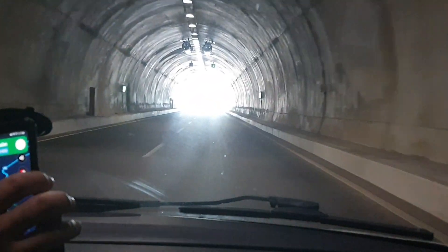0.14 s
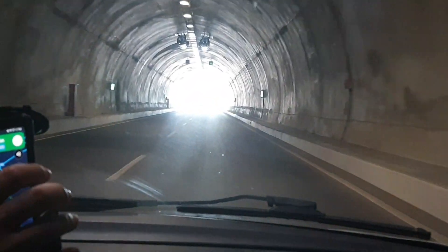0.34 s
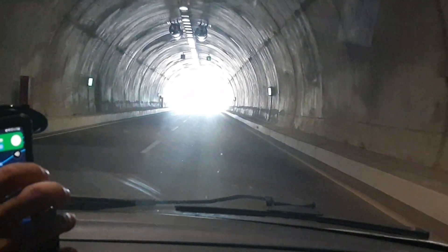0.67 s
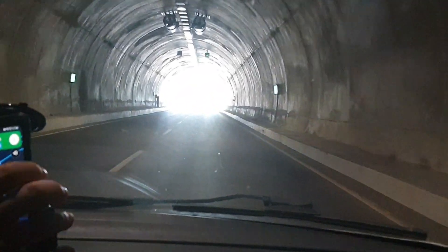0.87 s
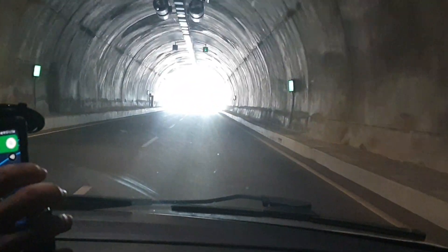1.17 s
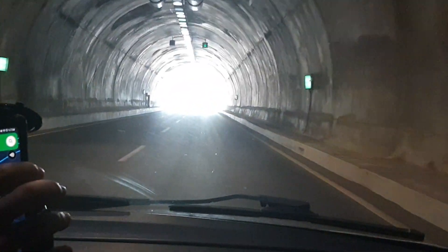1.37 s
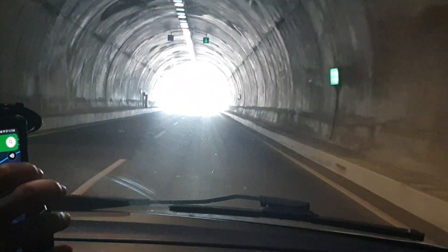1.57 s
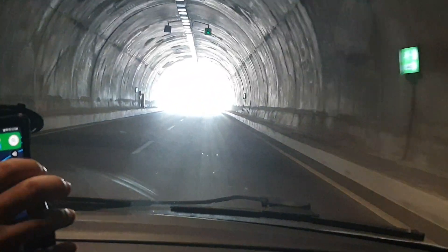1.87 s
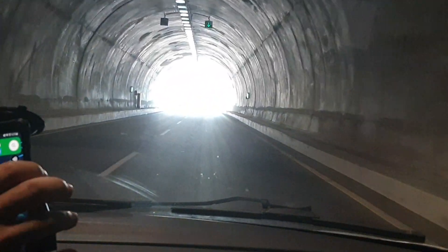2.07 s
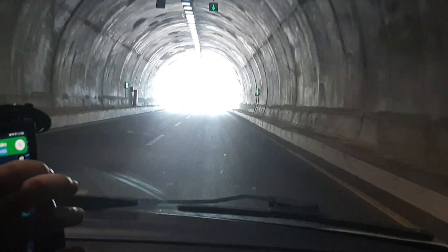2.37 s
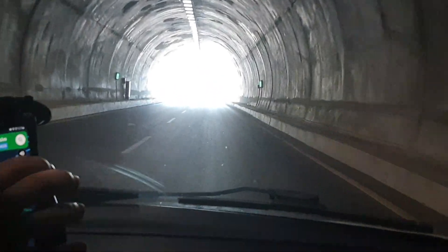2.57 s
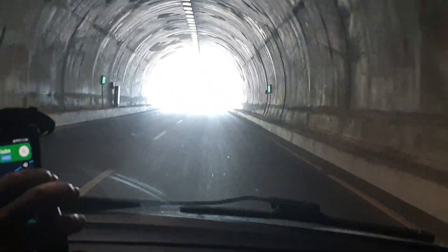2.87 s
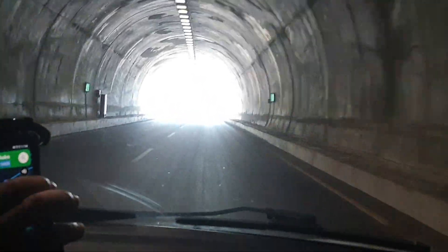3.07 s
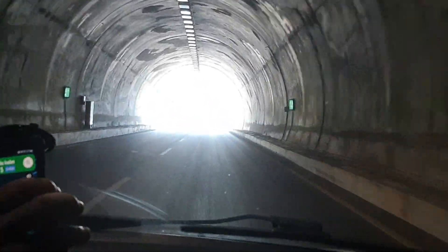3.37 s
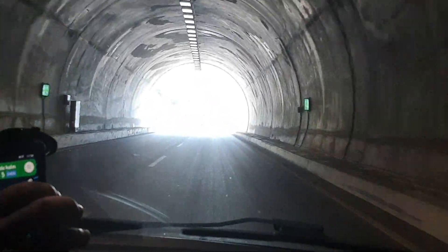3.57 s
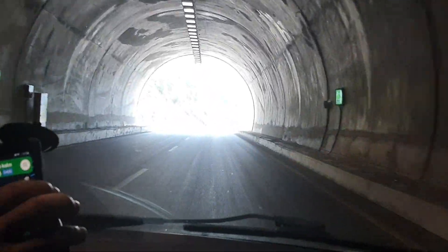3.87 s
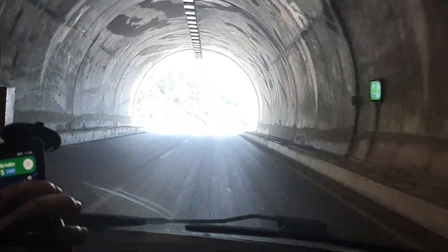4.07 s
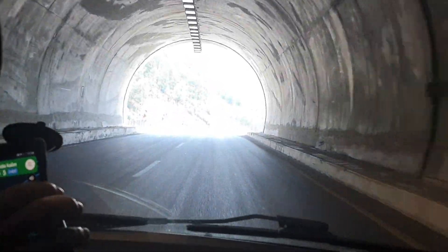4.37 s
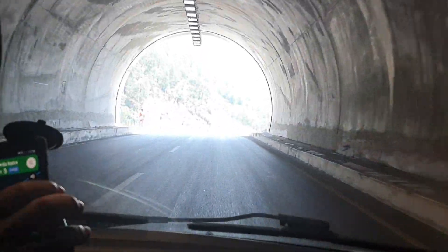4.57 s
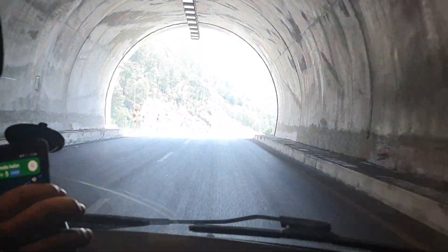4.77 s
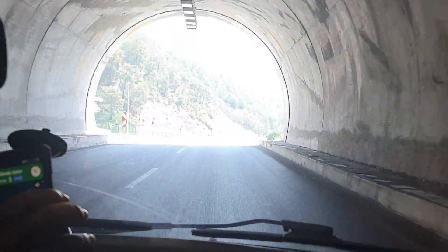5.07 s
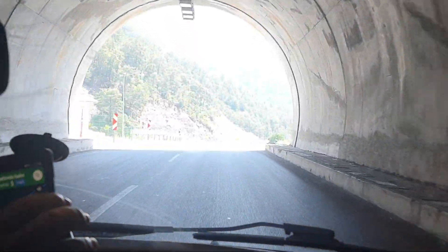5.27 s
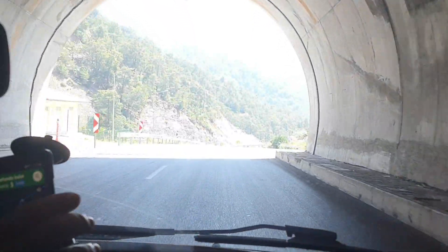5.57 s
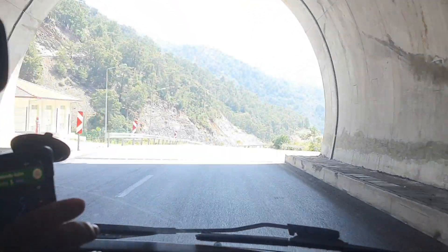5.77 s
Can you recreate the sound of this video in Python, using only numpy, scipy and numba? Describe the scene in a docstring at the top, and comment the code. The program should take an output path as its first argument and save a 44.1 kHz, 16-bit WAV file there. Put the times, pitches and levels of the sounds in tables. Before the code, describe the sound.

A car cabin in a road tunnel, heard from a handheld recorder close by. A loud, deep engine hum and thick road rumble dominate, with duller tyre roar and soft window hiss. A tiny rubbery squeak comes near one second, then a sharp finger snap on the right after two. The hum slowly drops in pitch and thins out near the end, with faint trim ticks.

```python
"""Car in a road tunnel

A car cruises through a road tunnel, heard from a handheld recorder in the cabin. The engine's firing
tone, a sine with an octave, booms and sags as the throttle eases. Road rumble, tyre roar, window hiss and
a faint whistle are shaped noise; trim ticks are noise puffs and seal squeaks are blurred sines.
A finger snaps on the right port, as clicks through resonators. The recorder's limiter rides on the boom."""
import sys
import numpy as np
from scipy import signal
from scipy.fft import rfft, irfft, next_fast_len
from scipy.io import wavfile
from scipy.ndimage import minimum_filter1d
from numba import njit

SR = 44100
rng = np.random.default_rng(int(sys.argv[2]) if len(sys.argv) > 2 else 0)


def to_wav(sig):
    """Store sig (one row per channel, or 1-D mono) as 16-bit WAV at the path in sys.argv[1].

    Samples outside -1..1 are clipped; the rate is SR.
    """
    pcm = np.clip(np.atleast_2d(sig), -1, 1) * 32767
    pcm = np.round(pcm).astype(np.int16)
    wavfile.write(sys.argv[1], SR, pcm.T)  # frames by channels


N = 261513   # samples


def engine(waver_db, waver_rad):
    """Periodic firing: a sine whose phase integrates the firing rate, with a rougher second harmonic."""
    # firing tone: (time [s], firing rate [Hz], boom level [dB], second harmonic level [dB])
    firing = [(0, 80.1, -8, -35), (2.05, 80.1, -7, -33), (2.35, 78.9, -7, -33), (2.9, 78.6, -7, -33),
              (3.5, 77.6, -10, -28), (3.93, 77, -12.5, -24), (4.03, 76.6, -19, -16), (4.19, 75.6, -16, -17),
              (4.3, 74.9, -12, -29), (4.55, 74.7, -9, -29), (4.9, 74.0, -10.5, -23),
              (5.3, 72.2, -12.5, -29), (5.6, 71.8, -18, -28), (5.8, 71.3, -22, -22), (5.93, 71, -25, -27)]
    hz, boom_db, octave_db = in_time(firing)
    phase = 2 * np.pi * np.cumsum(hz) / SR + waver_rad * drift(2.5)
    boom = from_db(boom_db + waver_db * drift(6.7)) * np.sin(phase)
    octave_phase = 2 * phase + .5 * drift(12.0)
    octave = from_db(octave_db + 1.5 * drift(12.0)) * np.sin(octave_phase)
    # the boom is equal at both ports, the octave leans right; the root makes the levels rms
    return np.sqrt(2) * (boom + octave * sides(-4.5))


def snaps():
    """Impulse excitation: each finger contact is a click and a rustle that ring the port's resonances."""
    # finger contacts: (time [s], click level [dB], rustle decay t60 [s])
    contacts = [(2.3278, -36, .03), (2.339, -38, .015), (2.343, -40, .05), (2.350, -21, .008),
                (2.352, -29, .02), (2.3566, -1, .003), (2.3577, 13, .003), (2.359, -22, .08),
                (2.363, -18, .006), (2.3672, -19, .006)]
    # resonances of the port: (frequency [Hz], level [dB], decay t60 [s])
    port = [(700, -10, 0.0024), (1500, 1, 0.0011), (3340, -13, 0.0013), (5600, -1, 0.00074),
            (7800, 0, 0.0012), (12000, 4.5, 0.00092), (14800, -1, .0015)]
    rustle_db, rustle_follows = -20, .7   # rustle behind a 0 dB click [dB]; dB per dB of click
    rustle_gain = sum(dying(s, rustle_db + rustle_follows * click_db, t60) for s, click_db, t60 in contacts)
    drive = rng.standard_normal(N) * rustle_gain + 1e-18
    for s, click_db, _ in contacts:
        drive[round(s * SR)] += from_db(click_db)
    ringing = 0
    for hz, level_db, t60 in port:
        # two-pole resonator: r sets the decay per sample, w the pitch
        r = from_db(-60 / (t60 * SR))
        w = 2 * np.pi * hz / SR
        mode = signal.lfilter([0, np.sin(w)], [1, -2 * r * np.cos(w), r * r], drive)
        ringing = ringing + from_db(level_db) * mode
    return ringing * from_db([[-24], [0]])   # the far port hears little


def squeak(blur_rad, octave_db):
    """Rubbing seal: two tones with attack, hold and decay, phase blurred by chance, with a weaker octave."""
    # squeaks of the rubber seal: (start [s], frequency [Hz], level [dB], hold from start [s], decay t60 [s])
    notes = [(1.13, 7200, -58, .04, .15), (1.155, 6540, -60.5, .12, .8)]
    attack_s, lean_db = .012, -16.0   # close to the right port
    t, out = np.arange(N) / SR, 0
    for s, hz, level_db, hold_s, t60 in notes:
        attack = np.clip((t - s) / attack_s, 0, 1)
        decay = from_db(level_db - 60 * np.clip(t - s - hold_s, 0, 1) / t60)
        phase = 2 * np.pi * hz * t + blur_rad * drift(120)
        tone = np.sin(phase) + from_db(octave_db) * np.sin(2 * phase)
        out = out + attack * decay * from_db(3.0 * drift(60)) * tone
    return out * sides(lean_db)


def ticks(rise_s):
    """Damped transients of loose trim: decaying puffs of coloured noise, the start softened by a low-pass."""
    # trim ticks: (time [s], level before softening [dB])
    puffs = [(4.357, -40), (4.68, -40), (5.125, -40), (5.557, -45), (5.77, -46)]
    # colour of a tick: (frequency [Hz], relative density [dB per Hz])
    trim = [(800, -14.5), (1950, 10), (2500, -3.5), (3250, 3.5), (3700, -11.5), (4300, 4), (5000, -10.5),
            (5700, -4), (7600, -11), (11000, -22)]
    t60_s, lean_db = .05, -8
    noise = rms_one(irfft(coloured(trim, channels=1)[1])[0, :N])
    shape = sum(dying(s, db, t60_s) for s, db in puffs) * sides(lean_db)
    r = np.exp(-1 / (rise_s * SR))
    return noise * signal.lfilter([1 - r], [1, -r], shape + 1e-18)


def rumble(swell_db):
    """Broadband road excitation in the bass: noise that follows part of the road's swell."""
    # colour of the rumble: (frequency [Hz], relative density [dB per Hz])
    rumble_colour = [(25, -24.5), (36, -6), (44, 1), (56, 3.5), (68, -2.5), (100, -0.5), (140, -4.5),
                     (175, -10.5), (200, -13), (235, -16.5), (330, -19), (450, -25), (700, -68),
                     (3000, -110)]
    level_db, follows = -14, 0.58   # follows: share of the swell
    return from_db(level_db + follows * swell_db) * road_noise(rumble_colour, gust_db=1.52, flutter_db=0.45)


def roar(swell_db):
    """Broadband tyre excitation in the middle range: noise that follows the whole swell."""
    # colour of the tyre roar: (frequency [Hz], relative density [dB per Hz])
    roar_colour = [(200, -25.5), (350, -18.5), (450, -8.5), (570, -10), (780, -12.5), (1300, -21.5),
                   (2400, -33.5), (4400, -38), (6300, -46), (8300, -45), (9000, -50.5), (9600, -63.5),
                   (12000, -64), (16000, -72)]
    return from_db(-34 + swell_db) * road_noise(roar_colour, gust_db=-0.63, flutter_db=1.0)


def hiss(swell_db):
    """Turbulence at the right window: broadband noise whose level exaggerates the swell."""
    # colour of the window hiss: (frequency [Hz], relative density [dB per Hz])
    window = [(700, -31), (1300, 14), (2200, -3.5), (3300, -17.5), (4300, -9), (6000, -20.5), (8000, -26),
              (10000, -37.5), (13000, -60.5)]
    level_db, follows = -47, 1.7   # follows: dB per dB of swell
    return from_db(level_db + follows * swell_db) * from_right(window, lean_db=-3.5, flutter_db=3.0)


def whistle():
    """Narrow-band noise: a faint breathy whistle close to the right port, rising to join the hiss."""
    # band of the whistle: (frequency [Hz], relative density [dB per Hz])
    band = [(3600, -30), (4050, -9), (4300, 0), (4550, -9), (5100, -30)]
    joining_db = np.interp(np.arange(N) / SR, [2.3, 3.3], [-17, 0])   # over time [s]
    return from_db(-61.5 + joining_db) * from_right(band, lean_db=-14.0, flutter_db=1.5)


def air():
    """Incoherent noise: a thin, steady top hiss, unrelated at the two ports."""
    # colour of the top hiss: (frequency [Hz], relative density [dB per Hz])
    air_colour = [(8500, -21.5), (9700, -6), (11500, -1), (13000, -1.5), (15000, -4.5), (16000, -9)]
    return from_db(-65) * rms_one(irfft(coloured(air_colour, channels=2)[1])[:, :N])


def road_swell():
    """Slow level modulation [dB] shared by the road noise and the window hiss."""
    # swell of the road noise: (time [s], level [dB])
    swell = [(0, 0.5), (.6, -0.5), (1.2, 2), (2.0, 0), (3.0, 0), (3.55, 0), (3.8, 2.5), (3.95, -0.5),
             (4.12, 4), (4.27, 1), (4.37, 2.5), (4.6, -0.5), (5.2, 1.5), (5.45, 0), (5.55, 1), (5.67, 0),
             (5.8, 1.5), (5.93, 0.5)]
    return in_time(swell)[0]


def road_noise(spectrum, gust_db, flutter_db):
    """Partly coherent stereo noise, lifted by cabin resonances, with slow and fast level drift; rms 1."""
    # left-right likeness: (frequency [Hz], correlation [-1 to 1])
    likeness = [(60, 0.92), (130, 1), (290, 0.83), (640, 0.36), (1410, -0.016), (3100, 0.11), (6820, 0.24),
                (15000, -0.68)]
    # balance: (frequency [Hz], left minus right [dB])
    lean = [(60, -5), (110, -3.5), (200, -4.5), (380, -1.5), (700, -1), (1290, 0.5), (2380, 0.5),
            (4400, -2), (8120, 1), (15000, -1)]
    # cabin resonances: (frequency [Hz], width [Hz], lift [dB])
    cabin = [(243, 16, 0), (268.7, 19, 7.5), (325, 35, 6), (450, 71, 3)]
    hz, (mid, side) = coloured(spectrum, channels=2)
    alike = np.clip(at_hz(likeness, hz), -1, 1)
    # the mid goes to both sides, the side noise with opposite signs
    pair = np.sqrt(1 + alike) * mid + np.sqrt(1 - alike) * side * [[1], [-1]]
    pair = pair * sides(at_hz(lean, hz))
    for centre_hz, width_hz, lift_db in cabin:
        pair = pair * from_db(lift_db / (1 + (2 * (hz - centre_hz) / width_hz) ** 2))
    level = from_db(gust_db * drift(0.83) + flutter_db * drift(27.0))
    return rms_one(irfft(pair)[:, :N] * level)


def from_right(spectrum, lean_db, flutter_db):
    """Interaural delay: noise from one spot on the right reaches the left port later and weaker; rms 1."""
    lag_s = .00036
    hz, noise = coloured(spectrum, channels=1)
    delay = np.exp(-2j * np.pi * hz * lag_s * np.array([[1], [0]]))   # a delay is a phase slope
    return rms_one(irfft(noise * delay)[:, :N] * sides(lean_db) * from_db(flutter_db * drift(10.0)))


def coloured(spectrum, channels):
    """Spectral shaping: frequency axis [Hz] and spectra of unrelated noises of the given colour."""
    size = next_fast_len(N)
    hz = np.maximum(np.arange(size // 2 + 1) * SR / size, 1)
    return hz, rfft(rng.standard_normal((channels, size))) * from_db(at_hz(spectrum, hz))


def dying(s, level_db, t60):
    """Exponential decay: gain that starts at s [s] and falls 60 dB in t60 [s]."""
    t = np.arange(N) / SR - s
    return from_db(level_db - 60 * np.clip(t, 0, 1) / t60) * (t >= 0)


def drift(rate):
    """Low-passed chance: noise at every 40th sample through a double pole at rate [Hz]; rms 1."""
    r = np.exp(-80 * np.pi * rate / SR)
    noise = rng.standard_normal(N // 40 + 2002)
    slow = signal.lfilter([1], [1, -2 * r, r * r], noise)[2000:]   # skip the filter's start
    return np.interp(np.arange(N) / 40, np.arange(len(slow)), rms_one(slow))


def sides(lean_db):
    """Level difference: left and right gains, half the lean each; positive leans left."""
    return from_db(np.array([[.5], [-.5]]) * lean_db)


def in_time(rows):
    """Linear interpolation: each column of a timed table, one value a sample."""
    s, *columns = np.transpose(rows)
    return [np.interp(np.arange(N) / SR, s, c) for c in columns]


def at_hz(points, hz):
    """Logarithmic frequency scale: read a (frequency [Hz], value) table along it."""
    table_hz, values = np.transpose(points)
    return np.interp(np.log(hz), np.log(table_hz + 1), values)


def from_db(db):
    """Logarithmic level: decibels to amplitude gain."""
    return 10 ** (np.asarray(db) / 20)


def rms_one(x):
    """Power normalisation: scale to unit rms."""
    return x / np.sqrt(np.mean(x ** 2) + 1e-20)


def scene():
    """Superposition: all sources summed at the two ports."""
    swell_db = road_swell()
    drone = engine(waver_db=.9, waver_rad=.15)
    seal = squeak(blur_rad=2.1, octave_db=-8.0)
    contacts = snaps() + seal + ticks(rise_s=0.0012)
    road = rumble(swell_db) + roar(swell_db)
    return drone + contacts + road + hiss(swell_db) + whistle() + air()


@njit
def follow(wanted, fall, rise):
    """One-pole smoothing: gain that drops fast towards what is wanted and climbs back slowly."""
    gain, out = wanted[0], np.empty_like(wanted)
    for i in range(len(wanted)):
        gain += (wanted[i] - gain) * (fall if wanted[i] < gain else rise)
        out[i] = gain
    return out


def limiter(x, ceiling, ahead_s, attack_s, release_s):
    """Peak limiting: one gain for both sides, looking ahead for peaks over the ceiling."""
    span = round(ahead_s * SR)
    wanted = np.minimum(1, ceiling / (np.abs(x).max(0) + 1e-9))
    wanted = minimum_filter1d(wanted, span, origin=-(span // 2), mode="nearest")
    return x * follow(wanted, 1 / (attack_s * SR), 1 / (release_s * SR))


def record(dry):
    """Recorder chain: bass cut, hot input, limiter, more gain on the right, clipping, steep top cut."""
    bass_cut = signal.butter(2, 37, "high", fs=SR, output="sos")
    top_cut = signal.cheby2(16, 60, 15850, fs=SR, output="sos")   # 60 dB down from 15850 Hz
    hot = signal.sosfilt(bass_cut, dry) * from_db(3.5)
    held = limiter(hot, ceiling=0.95, ahead_s=0.0047, attack_s=0.0022, release_s=0.045)
    held = np.clip(held * from_db([[.3], [1.3]]), -1, 1)
    return np.clip(signal.sosfilt(top_cut, held), -1, 1)


dry = scene()
out = record(dry)
to_wav(out)
```